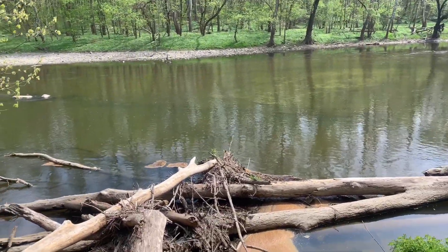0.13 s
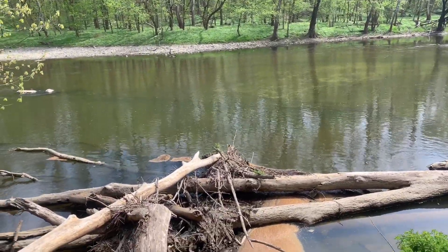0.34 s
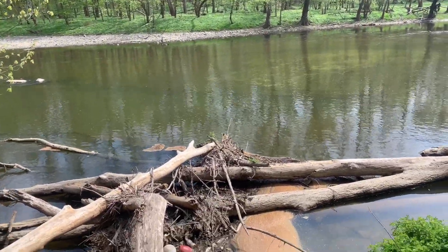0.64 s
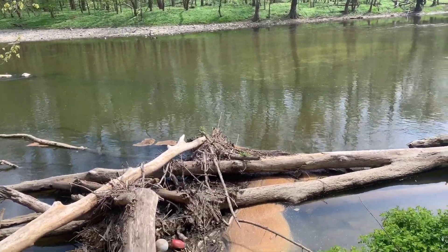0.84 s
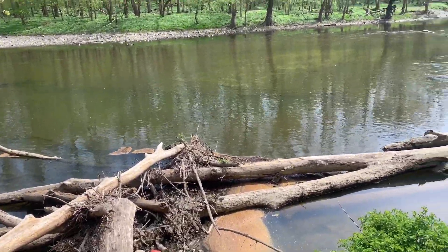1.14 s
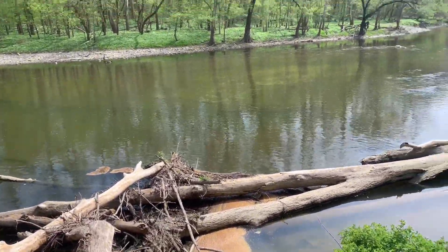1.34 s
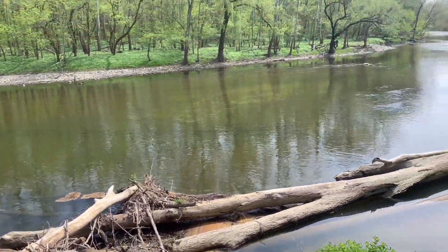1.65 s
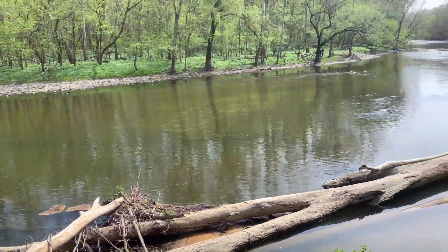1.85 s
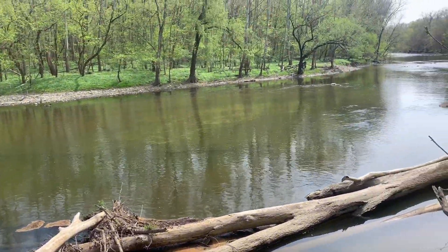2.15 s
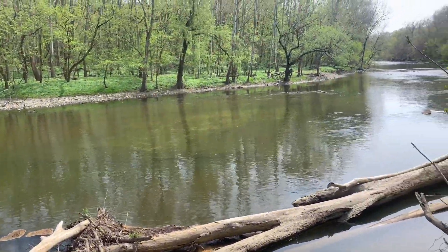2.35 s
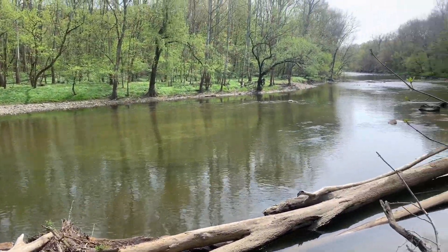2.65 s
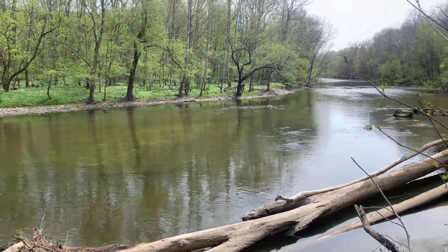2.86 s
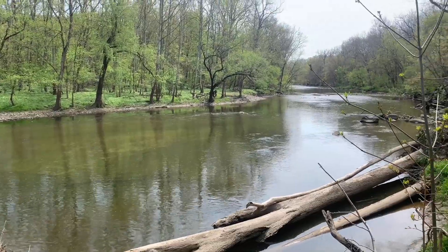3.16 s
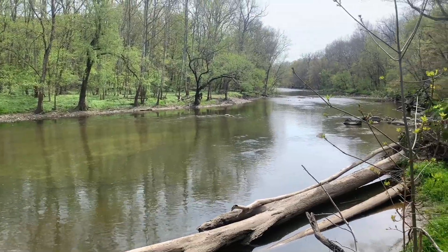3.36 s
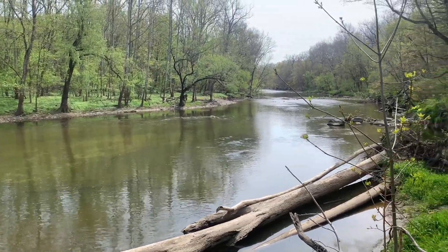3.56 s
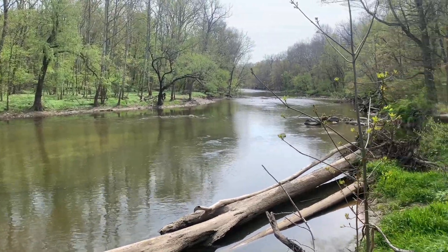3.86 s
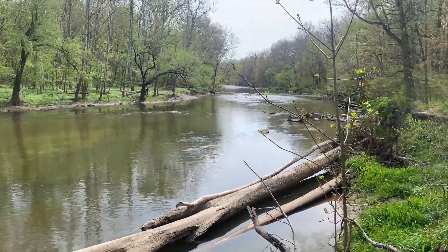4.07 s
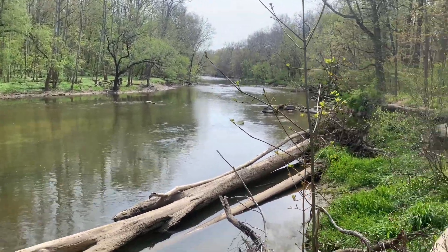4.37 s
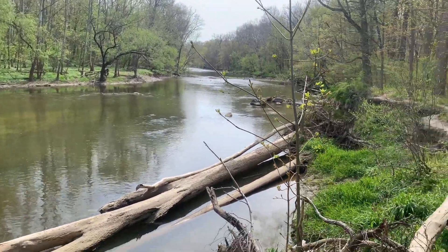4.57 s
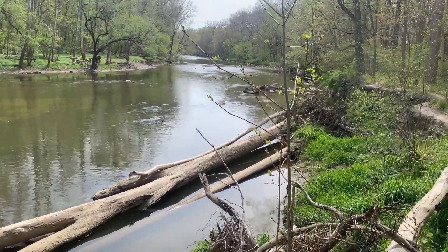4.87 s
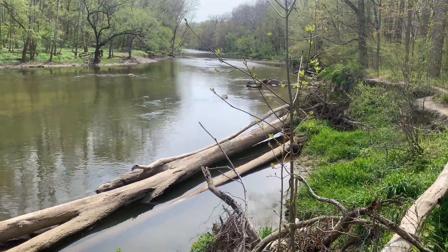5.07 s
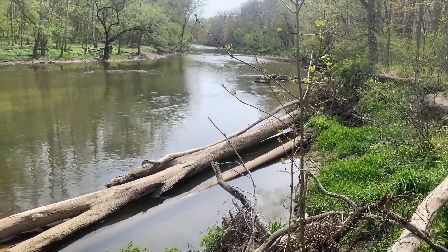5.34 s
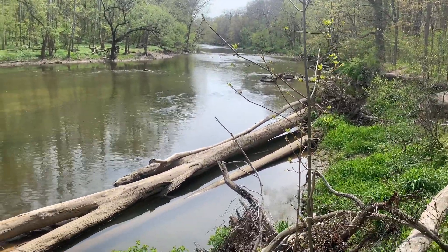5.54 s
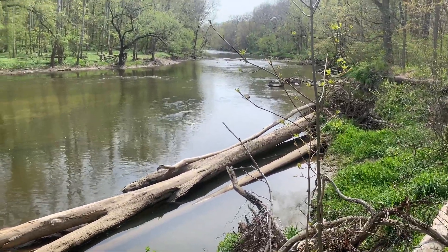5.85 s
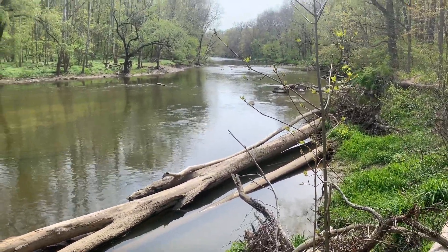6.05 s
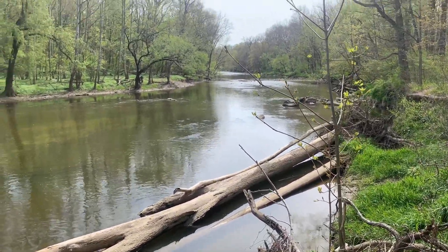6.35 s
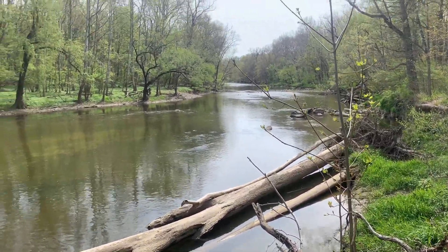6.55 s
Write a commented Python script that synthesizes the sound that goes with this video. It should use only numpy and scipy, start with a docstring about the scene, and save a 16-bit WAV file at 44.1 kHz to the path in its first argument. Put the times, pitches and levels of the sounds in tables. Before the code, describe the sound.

Steady far-off tyre roar with a deep wavering engine hum, soft wind thumps, a few close dry ticks, and barely audible river wash.

```python
"""Tyre roar from a busy road far off to the right of a river bank, blurred by distance; one big engine slowly
gains speed and other vehicle tones come and go. Tyres and the faint river wash are patchy filtered noise,
engine and tones are wavering sines. The hand-held recorder turns from the water to along the bank. Breeze
buffets its ports, mostly early on; something rustles, taps and ticks close by, and a far bird calls once.
The road reaches the left port late; a faint patchy high hiss lies under everything."""
import sys
import numpy as np
from scipy import signal
from scipy.fft import rfft, irfft, next_fast_len
from scipy.io import wavfile
from scipy.ndimage import uniform_filter1d, map_coordinates

SR = 44100
rng = np.random.default_rng(int(sys.argv[2]) if len(sys.argv) > 2 else 0)


def unload_wav(signal):
    """Save mono or channel-first audio to the path in sys.argv[1] as 16-bit WAV at rate SR, clipped to [-1, 1]."""
    wavfile.write(
        sys.argv[1],
        SR,
        np.round(np.clip(np.atleast_2d(signal).T, -1, 1) * 32767).astype(np.int16),
    )


N = 295911


def amp(db):
    """Decibels to gain."""
    return 10 ** (np.asarray(db) / 20)


def unit(x):
    """x at rms 1."""
    return x / np.sqrt(np.mean(x ** 2) + 1e-20)


def along(points, hz):
    """(frequency_hz, value) points read on a log frequency axis."""
    f, v = np.transpose(points)
    return np.interp(np.log(hz + 1), np.log(f + 1), v)


def curves(rows):
    """One value per sample for each column after the time."""
    s, *columns = np.transpose(rows)
    return [np.interp(np.arange(N) / SR, s, column) for column in columns]


def wobble(rate):
    """A smooth random curve with rate knots a second."""
    coarse = np.arange(0, N + 16, 16)
    knots = rng.standard_normal(int(N * rate / SR) + 4)
    values = map_coordinates(knots, [coarse * rate / SR])
    return np.interp(np.arange(N), coarse, values)


def swell(start, end):
    """A smooth rise and fall between two times."""
    u = np.clip((np.arange(N) / SR - start) / (end - start), 0, 1)
    return np.clip(2 * np.sin(np.pi * u), 0, 1) ** 2


def flare(start, peak, fade):
    """Builds up to a peak, then dies away exponentially."""
    t = np.arange(N) / SR
    build = np.clip((t - start) / (peak - start), 0, 1) ** 2
    return build * np.exp(-np.clip(t - peak, 0, None) / fade)


def filtered(x, response):
    """x times a complex response of frequency."""
    m = next_fast_len(N + SR // 2)
    return irfft(rfft(x, m) * response(np.fft.rfftfreq(m, 1 / SR)), m)[..., :N]


def add_at(total, start_s, sound):
    """Mixes a short sound into total from start_s on."""
    first = round(start_s * SR)
    total[:, first:first + sound.shape[-1]] += sound


def rush(spectrum, alike, patchy_db):
    """Stereo noise of rms 1 with patches of random gain; alike sets how far the ports agree."""
    z = signal.stft(rng.standard_normal((2, N)), nperseg=1024)[2]
    field = uniform_filter1d(rng.standard_normal(z.shape[1:]), size=3, axis=0)
    field = uniform_filter1d(field, size=8, axis=1)
    pair = signal.istft(z * amp(patchy_db * unit(field)), nperseg=1024)[1][:, :N]

    def mid_side(hz):
        # mid and side shares whose left-right correlation is the wanted likeness
        angle = np.arccos(np.clip(along(alike, hz), -1, 1)) / 2
        return amp(along(spectrum, hz)) * [np.cos(angle), np.sin(angle)]

    mid, side = filtered(pair, mid_side)
    return unit(np.array([mid + side, mid - side]))


# The hand-held recorder turning: time_s, turned (0 water, 1 along the bank),
# bass_left_minus_right_db, treble_left_minus_right_db
RECORDER_TURN = [(0, 0, -1.3, -1), (1.8, .15, -1.7, -2), (3.6, .9, -3, -2.5), (6.71, .98, -3.5, -1.5)]


def recorder_turn():
    """How far the recorder has turned, with the bass and treble balance."""
    turned, bass_db, treble_db = curves(RECORDER_TURN)
    return np.clip(turned, 0, 1), bass_db, treble_db


# Likeness of the two ports facing the water: frequency_hz, correlation
ALIKE_WATER = [(60, .8), (260, .84), (430, .62), (600, .25), (800, .42), (1050, .7), (1400, .48),
               (1640, .1), (1850, .45), (2150, .8), (2500, .47), (2750, .15), (3200, .5), (3800, .1),
               (4400, .45), (5000, .1)]
# Likeness of the two ports facing along the bank: frequency_hz, correlation
ALIKE_BANK = [(60, .97), (260, .92), (430, .57), (600, .4), (780, .5), (980, .2), (1290, .74), (1640, .45),
              (2150, .63), (2550, .15), (3050, .5), (3600, .15), (4250, .45), (5000, .1)]


def roadside_noise(facing_water, facing_bank):
    """Noise from the road side, cross-faded at equal power as the recorder turns."""
    turned = recorder_turn()[0]
    before = np.sqrt(1 - turned) * rush(facing_water, ALIKE_WATER, patchy_db=1.95)
    return before + np.sqrt(turned) * rush(facing_bank, ALIKE_BANK, patchy_db=2.0)


# Spectrum of the faint high hiss: frequency_hz, level_db
HIGH_HISS_BAND = [(3000, 0.5), (6000, -8), (9000, -3.5), (11500, -4.5), (14000, -11), (16000, -13)]


def high_hiss():
    """A faint patchy high hiss throughout, a little stronger at the left."""
    alike = [(6000, .1), (9000, .7), (11500, -.2), (14000, .8)]  # frequency_hz, correlation
    return amp([[-77.3], [-78.8]]) * rush(HIGH_HISS_BAND, alike, patchy_db=2.0)


# Level of the river wash: time_s, level_db
WASH_LEVEL = [(0, -75.5), (.35, -76.5), (.6, -76.5), (1, -76.5), (1.3, -78.5), (1.9, -76.5), (2.4, -76.5),
              (3, -75.5), (3.6, -74.5), (4.2, -73.5), (4.6, -72), (5.1, -71.5), (5.6, -72.5), (6.1, -71.5),
              (6.71, -70)]
# Spectrum of the river wash: frequency_hz, level_db
WASH_BAND = [(2200, -34.5), (2800, -6.5), (3500, -6), (4200, -11.5), (4800, -16), (5400, -22), (7000, -24),
             (9000, -61.5)]


def river_wash():
    """Far riffles lie the same way as the road; their noise flickers in level."""
    level_db = curves(WASH_LEVEL)[0] + 0.8 * wobble(12) + 0.9 * wobble(2.5)
    return amp(level_db) * roadside_noise(WASH_BAND, WASH_BAND)


# A faint narrow hiss: start_s, end_s, level_db
NARROW_HISS = (4.72, 5.14, -76.5)
# Its spectrum: frequency_hz, level_db
NARROW_HISS_BAND = [(3200, -40), (3550, -4), (3720, 0), (3900, -5), (4300, -40)]


def narrow_hiss():
    """A narrow band of noise that swells once and fades."""
    start, end, db = NARROW_HISS
    return amp(db) * swell(start, end) * rush(NARROW_HISS_BAND, [(3700, -.3)], patchy_db=3)


# One far bird: start_s, end_s, start_hz, end_hz, level_db
BIRD_CALL = (3, 3.5, 6799, 7153, -80)


def bird():
    """A thin rising note that levels off; from the side, it arrives half a cycle apart at the ports."""
    start, end, from_hz, to_hz, db = BIRD_CALL
    rise = np.sqrt(np.clip((np.arange(N) / SR - start) / (end - start), 0, 1))
    pitch = from_hz + (to_hz - from_hz) * rise
    note = np.sin(2 * np.pi * np.cumsum(pitch) / SR + .4 * wobble(90))
    return np.sqrt(2) * amp(db) * swell(start, end) * note * [[.9], [-1]]


# Gusts on the ports: start_s, end_s, level_db
GUST_TIMES = [(-.2, 0.252, -39), (.3, 1, -39.5), (1.2, 1.9, -43.5), (2.1, 3.006, -38),
              (4.602, 6.706, -45.5)]
# Spectrum of the buffeting: frequency_hz, level_db
BUFFET_BAND = [(15, -44.5), (35, -12), (50, 0.5), (80, -4.5), (130, -13.5), (250, -32), (500, -71.5),
               (1000, -140)]


def buffeting():
    """Air turbulence at the ports: lumpy low noise, partly different at each."""
    calm_db, right_port_db = -51, -1.5  # breeze between gusts; right port relative to left
    lumps = amp(3.6 * wobble(5.7) + 1.4 * np.array([wobble(8.8), wobble(7.9)]))
    strength = amp(calm_db) + sum(amp(db) * swell(start, end) for start, end, db in GUST_TIMES)
    noise = unit(lumps * rush(BUFFET_BAND, [(50, 0.9)], patchy_db=2.0))
    return strength * amp([[0], [right_port_db]]) * noise


# Low bumps of the breeze: start_s, level_db, start_hz, end_hz, length_s, left_minus_right_db
WIND_BUMPS = [(.1245, -14.5, 120, 60, .009, 1.5), (.2845, -15.5, 68, 66, .021, 4),
              (.2992, -13.2, 285, 60, .03, -.3)]


def wind_bumps():
    """The breeze bumps the recorder: short low pushes whose pitch falls."""
    total, t = np.zeros((2, N)), np.arange(SR // 4) / SR
    for s, db, from_hz, to_hz, length, pan_db in WIND_BUMPS:
        pitch = to_hz + (from_hz - to_hz) * np.exp(-t / .007)
        push = (1 - np.exp(-t / .003)) * np.exp(-(t / length) ** 4)
        bump = amp(db) * push * np.sin(2 * np.pi * np.cumsum(pitch) / SR)
        add_at(total, s, bump * amp([[pan_db / 2], [-pan_db / 2]]))
    return total


# Rustles close by: start_s, peak_s, fade_s, level_db
RUSTLE_TIMES = [(.33, .36, .025, -73), (.4, .434, .02, -64.5), (.45, .475, .03, -68), (.55, .95, .15, -70),
                (.93, 1.09, .035, -67.5)]
# Spectrum of the rustles: frequency_hz, level_db
RUSTLE_BAND = [(600, -80), (1500, -5.5), (3000, 3), (4500, -4.5), (6500, -13), (9000, -15.5),
               (15500, -16.5)]


def rustles():
    """Noise with a fast random level crackles in bursts that build and die away."""
    crackle = unit(amp(2.2 * wobble(250)) * rush(RUSTLE_BAND, [(1000, .5)], patchy_db=1.5))
    return crackle * sum(amp(db) * flare(start, peak, fade) for start, peak, fade, db in RUSTLE_TIMES)


# Dry ticks close by: start_s, peak_db, centre_hz
TICK_TIMES = [(.324, -69, 10000), (.343, -57, 17000), (0.3467, -60, 19000), (.351, -57, 14000),
              (.357, -63, 19000), (.361, -58.5, 14000), (.365, -62, 17000), (.372, -63.5, 19000),
              (.401, -70, 19000), (.436, -68.5, 7500), (.471, -71, 8500), (.641, -73, 9000),
              (1.105, -67, 3300), (1.99, -71.5, 5000), (3.08, -71.5, 4500), (4.43, -69, 5000),
              (5.314, -54, 19000), (5.326, -60, 19000), (5.955, -65, 4030), (6.455, -69.5, 6000)]


def ticks():
    """Each tick is a short decaying noise puff round its own centre frequency."""
    t60_s, attack_s = 0.022, 0.0005
    total, t = np.zeros((2, N)), np.arange(2048) / SR
    for s, db, centre_hz in TICK_TIMES:
        puff = rng.standard_normal(len(t)) * amp(-60 * t / t60_s) * (1 - np.exp(-t / attack_s))
        edges = np.clip([centre_hz * .5, centre_hz * 1.7], 100, SR * .45)
        puff = signal.sosfilt(signal.butter(3, edges, "bandpass", fs=SR, output="sos"), puff)
        add_at(total, s, amp(db) * puff / np.abs(puff).max())
    return total


# Dull taps on the recorder's case: start_s, level_db, tilt_db_per_octave (above 2 kHz)
CASE_TAPS = [(.4705, -36.5, -1.5), (.4745, -46, 0), (.4855, -51, 0), (.5530, -38.5, -5.5)]
# Modes of the case: frequency_hz, level_db, t60_s
CASE_MODES = [(1300, 0, .012), (2100, 0, .008), (3100, -7, .006), (4300, -12, .006), (5200, -18, .005)]


def case_taps():
    """Each tap rings the modes of the case, which die away in milliseconds."""
    attack_s = 0.00035
    total, t = np.zeros((2, N)), np.arange(2048) / SR
    for s, db, tilt_db in CASE_TAPS:
        ring = 0
        for hz, level, t60 in CASE_MODES:
            mode_db = level + tilt_db * max(np.log2(hz / 2000), 0) - 60 * t / t60
            ring = ring + amp(mode_db) * np.sin(2 * np.pi * hz * t + rng.uniform(0, 1))
        add_at(total, s, amp(db) * (1 - np.exp(-t / attack_s)) ** 2 * ring)
    return total


# Other vehicle tones: start_s, end_s, start_hz, end_hz, level_db, unsteadiness (scales the random level)
VEHICLE_TONES = [(.2, 2.3, 72.5, 74, -39, 2), (.2, 1.2, 153, 153, -41, 1), (4.6, 5.3, 148, 147, -48, 4),
                 (5.5, 7.2, 148, 146, -47.5, 3), (2.6, 4.6, 150, 147, -50, 4), (1.7, 3.1, 113, 117, -48, 2),
                 (-.3, .7, 275, 274, -48, 2), (.8, 1.9, 273, 273, -54, 2), (3, 4, 141, 141, -50, 2),
                 (3, 7, 266, 264, -55, 3), (2, 6.7, 782, 774, -57.5, 4), (4.37, 4.5, 1490, 1475, -51, 2),
                 (4.32, 4.48, 1590, 1670, -57, 3)]


def vehicle_tones():
    """Each tone glides a little, swells and fades."""
    t, total = np.arange(N) / SR, 0
    for start, end, from_hz, to_hz, db, unsteadiness in VEHICLE_TONES:
        phase = 2 * np.pi * np.cumsum(np.interp(t, [start, end], [from_hz, to_hz])) / SR
        # the path length drifts by centimetres
        phase += from_hz / 800 * (wobble(4) + wobble(9) + .9 * wobble(22))
        level_db = db + unsteadiness * (.8 * wobble(3.1) + .7 * wobble(11))
        total += np.sqrt(2) * amp(level_db) * swell(start, end) * np.sin(phase)
    return total


# Speed of the big engine: time_s, firing_cycles_hz
ENGINE_SPEED = [(0, 15.94), (1, 16.19), (2.1, 16.36), (5.1, 17.22), (6.71, 17.47)]
# Harmonics of its firing cycle: order, level_db
ENGINE_ORDERS = [(3, -44), (4, -37), (5, -37.5), (6, -54), (7, -47.5)]
# Its changing level: time_s, odd_orders_db, even_orders_db
ENGINE_LOUDNESS = [(0, 4, 6), (.6, -6, -6), (1.2, -2, 0), (1.6, -3, 1), (2.1, -3, -2), (2.6, -1, -5),
                   (2.95, -1, -4), (3.2, -1, 2), (3.8, -1, -2), (4.2, -1, -1), (4.6, -1, 3), (5, 0, 0),
                   (5.35, 1, 2), (5.6, 1, -7), (5.8, 1, 3), (6.15, 5, 1), (6.4, 1, 3), (6.71, 0, 0)]


def engine():
    """Low orders of one firing cycle throb together; the air on the way makes each one waver."""
    cycle = 2 * np.pi * np.cumsum(curves(ENGINE_SPEED)[0]) / SR
    odd_db, even_db = curves(ENGINE_LOUDNESS)
    total = 0
    for order, db in ENGINE_ORDERS:
        order = round(order)
        smear = .3 * (order - 5) ** 2  # the exhaust pipe spreads each pulse in time
        waver_db = 1.2 * wobble(1.818) + 2.6 * wobble(9)  # slow and quicker fading over the long path
        level_db = db + (odd_db if order % 2 else even_db) + waver_db
        total -= np.sqrt(2) * amp(level_db) * np.sin(order * cycle - smear + 0.4 * wobble(4.1))
    return total


# Vehicles clear a gap in the trees: start_s, peak_s, fade_s, level_db
GAP_SURGES = [(4.26, 4.42, .09, -46), (4.42, 4.76, .06, -50)]
# Spectrum of these surges: frequency_hz, level_db
GAP_SURGE_BAND = [(750, -60), (920, -6), (1000, 1), (1090, -8), (1300, -13), (1450, -3), (1520, -1),
                  (1700, -3), (1900, -11), (2300, -40), (3500, -100)]


def gap_surges():
    """Traffic noise flares up as vehicles clear a gap in the trees."""
    strength = sum(amp(db) * flare(start, peak, fade) for start, peak, fade, db in GAP_SURGES)
    return strength * rush(GAP_SURGE_BAND, ALIKE_BANK, patchy_db=1.5)


# Spectrum of the exhaust rumble: frequency_hz, level_db
RUMBLE_BAND = [(25, -36), (45, -10.5), (75, -1), (105, -10), (150, -9), (200, -12), (300, -14), (390, -21),
               (600, -45.5), (1200, -120)]


def exhaust_rumble(air):
    """Low exhaust noise, stronger at first and receding exponentially."""
    level_db, extra_db, recede_s = -37, 4.5, 0.84
    receding_db = level_db + extra_db * np.exp(-np.arange(N) / SR / recede_s)
    return amp(receding_db + 0.27 * air) * roadside_noise(RUMBLE_BAND, RUMBLE_BAND)


# Tyre hiss facing the water: frequency_hz, level_db
HISS_WATER = [(680, -35), (1150, -6.5), (1350, 2), (1490, -0.5), (2100, -5), (2390, -10), (3050, -22),
              (3960, -52), (6710, -120)]
# Tyre hiss facing along the bank: frequency_hz, level_db
HISS_BANK = [(680, -33.5), (1150, -4), (1310, -1), (1480, 0), (1690, -3.5), (2580, -17), (3050, -22.5),
             (3960, -55.5), (6710, -120)]
# The hiss thickens for a while: start_s, end_s, extra_db
HISS_SWELL = (3.9, 4.6, 0.93)


def tyre_hiss(air):
    """The upper tyre noise, which gains level with the turn along the bank."""
    level_db, turn_gain_db = -55, 3.5
    start, end, extra_db = HISS_SWELL
    level_db = level_db + turn_gain_db * recorder_turn()[0] + extra_db * swell(start, end)
    return amp(level_db + 0.3 * air) * roadside_noise(HISS_WATER, HISS_BANK)


# Tyre roar facing the water: frequency_hz, level_db
ROAR_WATER = [(220, -30), (381, -7), (457, -10), (531, -4), (629, -11.5), (716, -4), (893, -2),
              (1150, -13.5), (1300, -15), (1690, -48), (2860, -120)]
# Tyre roar facing along the bank: frequency_hz, level_db
ROAR_BANK = [(220, -39.5), (380, -19), (472, -5), (585, -7), (761, -3), (797, -1), (861, -11.5),
             (1010, -8.5), (1300, -18), (1690, -50), (2860, -120)]


def tyre_roar(air):
    """Many tyres blur into one broad noise, slightly louder facing along the bank."""
    level_db, turn_gain_db = -43.5, 1
    level_db = level_db + turn_gain_db * recorder_turn()[0]
    return amp(level_db + 0.42 * air) * roadside_noise(ROAR_WATER, ROAR_BANK)


# Phase between the ports for sound from the right: frequency_hz, left_lead_rad (negative is late)
LEFT_PORT_LEAD = [(0, 0), (40, -.35), (170, -.42), (340, -.65), (520, -.5), (690, -.2), (860, -1),
                  (1030, -2), (1380, -3.5), (1720, -5.3), (2070, -6.2), (2450, -6.8), (2800, -9.2),
                  (3400, -10), (4050, -12.5), (4700, -12.9), (5100, -15.7)]


def road_side():
    """Traffic and river arrive from the right; turning the recorder moves the traffic's balance."""
    _, bass_db, treble_db = recorder_turn()
    half = np.array([[.5], [-.5]])  # shares a left-right difference between the ports
    air = wobble(5.8)  # turbulence on the long path
    low = vehicle_tones() + engine() + exhaust_rumble(air)
    high = gap_surges() + tyre_hiss(air) + tyre_roar(air)
    arriving = river_wash() + narrow_hiss() + low * amp(half * bass_db) + high * amp(half * treble_db)
    lead_hz, lead = np.transpose(LEFT_PORT_LEAD)
    return filtered(arriving, lambda hz: np.exp(1j * half * np.interp(hz, lead_hz, lead)))


def scene():
    """A far bird, breeze on the ports, near sounds, and the road with the river."""
    breeze = buffeting() + wind_bumps()
    nearby = rustles() + ticks() + case_taps()
    return bird() + breeze + nearby + road_side()


# Overall treble level, a hole near 12 kHz and slightly raised around 14 kHz: frequency_hz, gain_db
TREBLE_SHAPE = [(9000, 0), (10800, -1), (11400, -14), (12200, -14), (13000, 0), (14200, 3), (15700, 2)]


def record(dry):
    """Adds the faint high hiss, shapes the overall treble and leaves nothing above 15.7 kHz."""
    top_hz = 15700
    return filtered(dry + high_hiss(), lambda hz: amp(along(TREBLE_SHAPE, hz)) * (hz < top_hz))


dry = scene()
out = record(dry)
unload_wav(out)
```